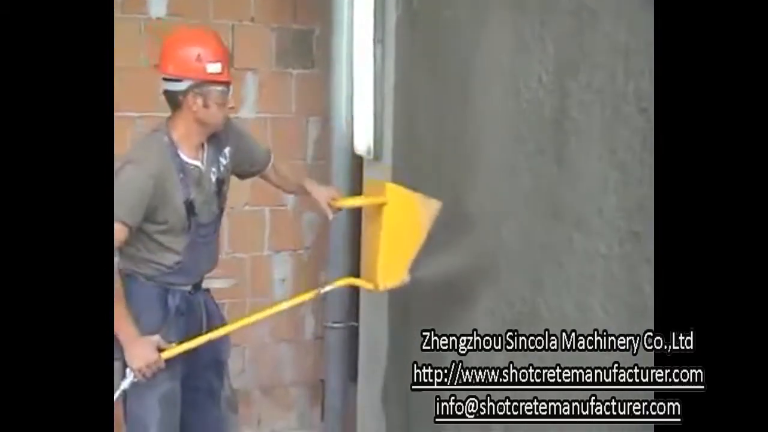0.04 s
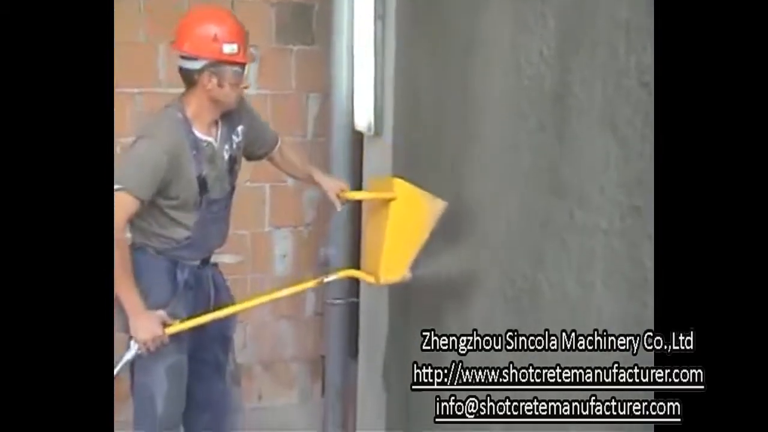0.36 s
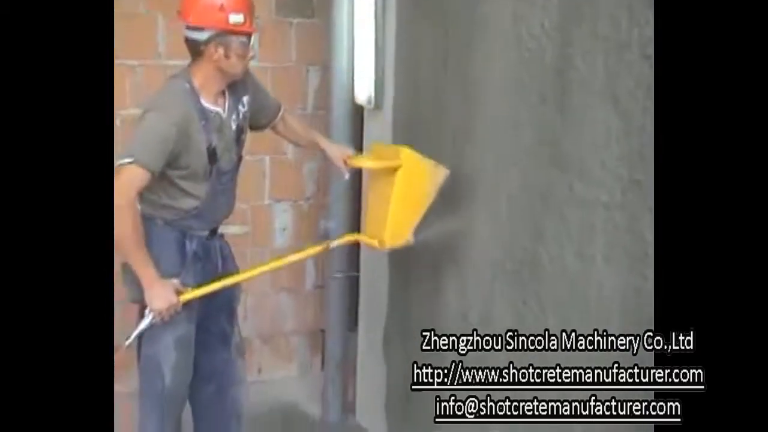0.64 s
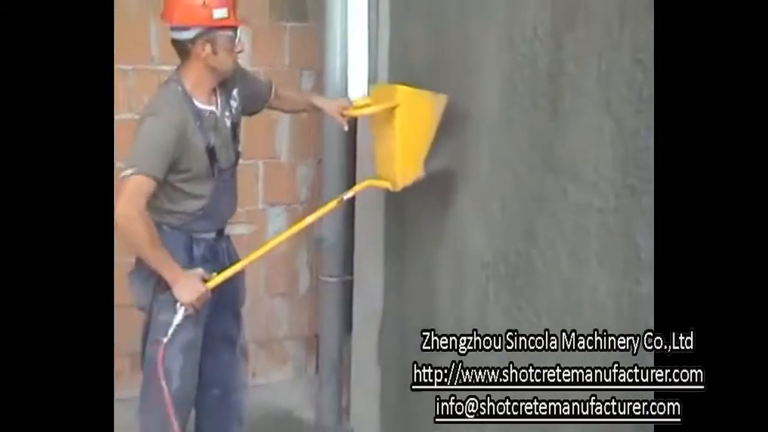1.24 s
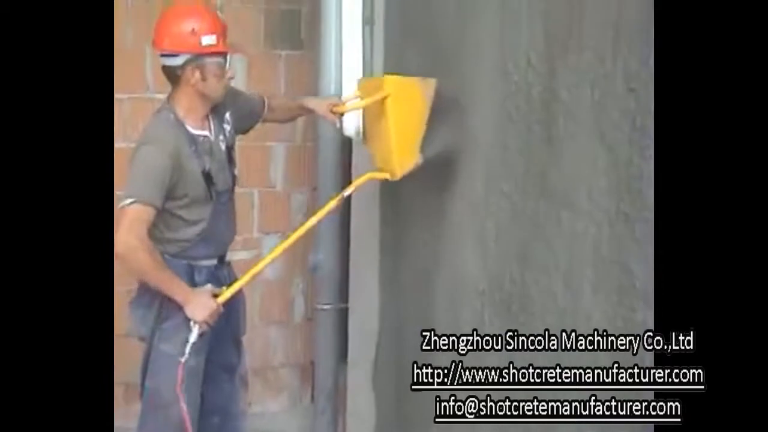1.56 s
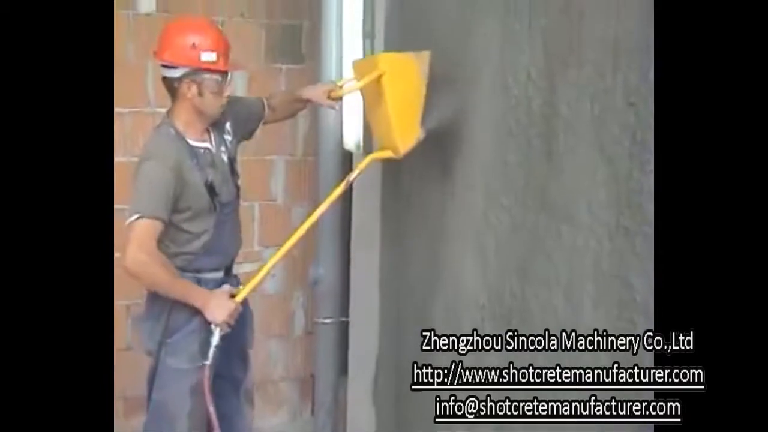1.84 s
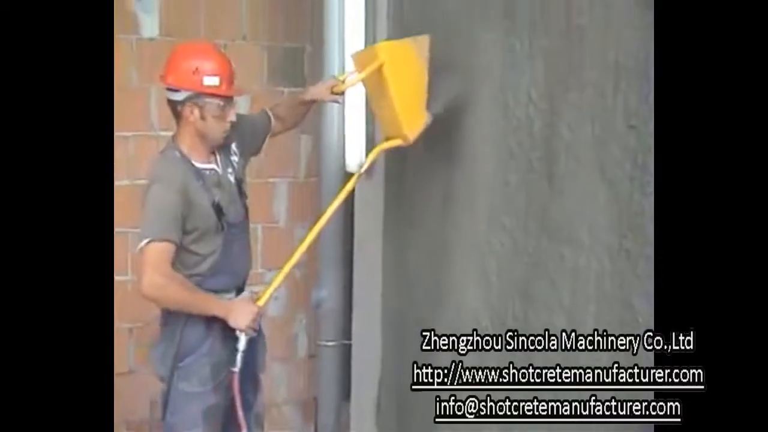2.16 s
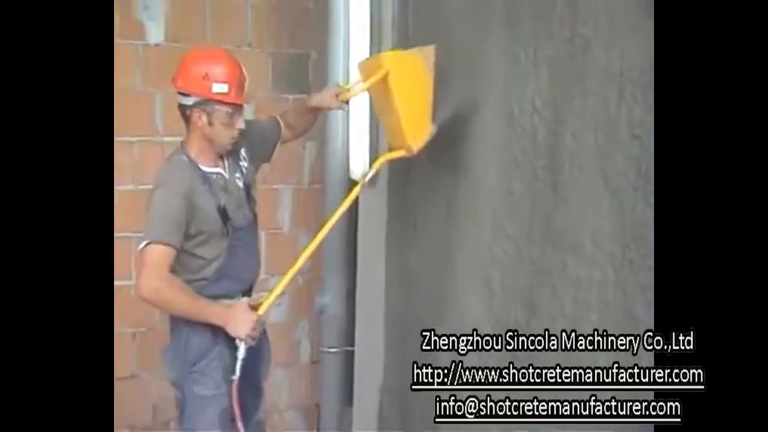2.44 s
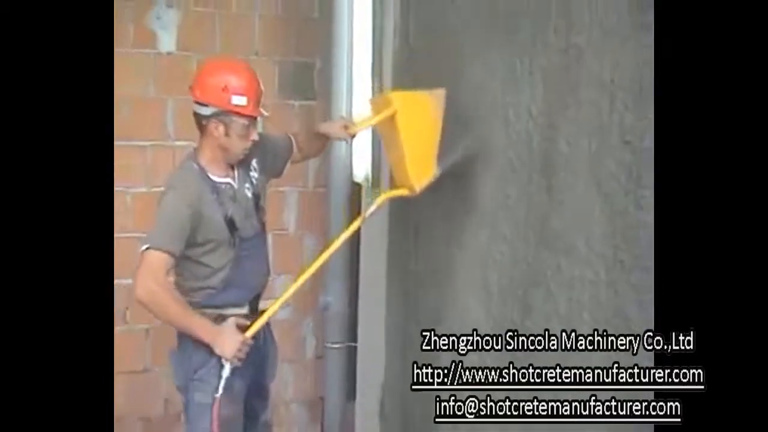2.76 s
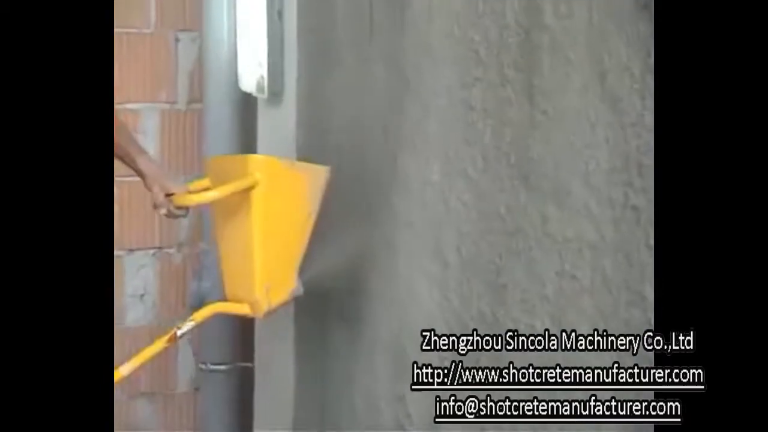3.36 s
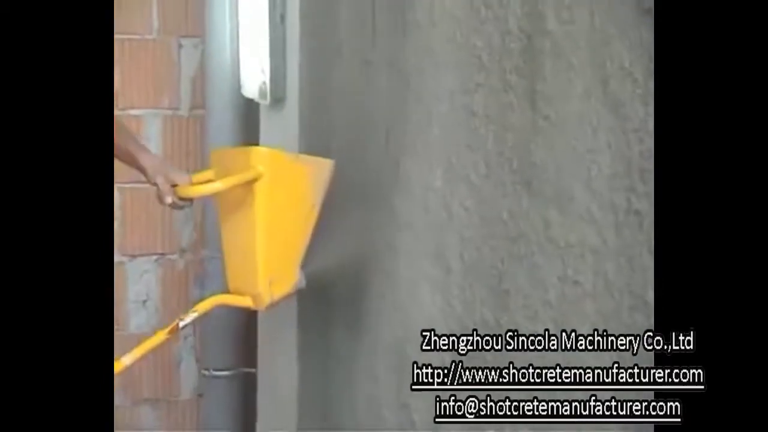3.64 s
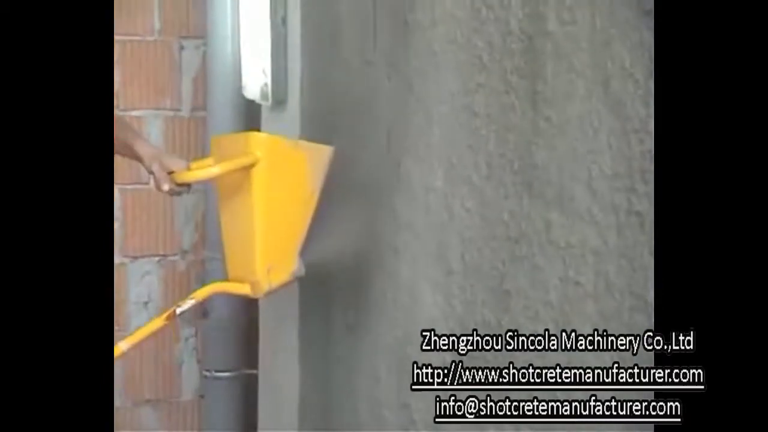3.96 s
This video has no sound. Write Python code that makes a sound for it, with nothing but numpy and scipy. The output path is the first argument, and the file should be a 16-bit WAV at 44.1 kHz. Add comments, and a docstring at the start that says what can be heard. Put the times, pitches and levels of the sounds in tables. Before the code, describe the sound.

A mortar sprayer hisses and sputters, blasting wet grit onto a wall.

```python
"""A bare brick room, one microphone near a hand-held hopper sprayer, a compressor humming in the distance.
Compressed air blows mortar onto the wall: the jet hisses and sputters, wet grit patters, the hopper
burbles and drones, and the wall's echo sweeps the hiss as the tool is raised.
The spray dies down; an edit cut leaves an instant's gap, then a second shot of steady spraying follows."""
import sys
import numpy as np
from scipy import signal
from scipy.fft import rfft, irfft
from scipy.io import wavfile
from scipy.ndimage import uniform_filter1d, map_coordinates

SR = 44100
rng = np.random.default_rng(int(sys.argv[2]) if len(sys.argv) > 2 else 0)


def wav_record(signal):
    """Record a signal, one row per channel, as 16-bit PCM in the file named by sys.argv[1]."""
    frames = np.transpose(np.atleast_2d(signal))
    bounded = np.clip(frames, -1, 1)
    # unit amplitude maps onto the largest positive 16-bit level
    quanta = np.round(bounded * 32767).astype(np.int16)
    wavfile.write(sys.argv[1], SR, quanta)


N = 176400

# Faders of the spray, tool raised and tool held: time_s, hiss_db, treble_db, splatter_db, burble_db
RAISED_LEVELS = [(0, -35, -43, -46.5, -55), (0.22, -41.5, -49, -49.5, -67), (0.38, -37.5, -47, -49.5, -56),
                 (0.56, -31.5, -38.5, -38.5, -48), (0.75, -28.5, -36.5, -36, -45),
                 (0.92, -25.5, -33.5, -34.5, -40.5), (1.1, -26.5, -33, -34, -37),
                 (1.42, -22.5, -31, -28.5, -32), (1.62, -21.5, -29, -34, -32.5),
                 (2.02, -22.5, -29.5, -30.5, -32), (2.18, -23, -29, -30, -35.5),
                 (2.32, -22.5, -28.5, -29, -30), (2.55, -24, -31, -33, -30), (2.74, -23.5, -31, -29, -31.5),
                 (2.86, -30, -41, -34.5, -32.5), (2.96, -41.5, -53, -41.5, -39), (3.06, -46, -67, -44, -43)]
HELD_LEVELS = [(3.1, -29, -34, -37, -37.5), (3.24, -26, -32, -33.5, -42), (3.42, -27, -33.5, -35.5, -38),
               (3.56, -26, -32.5, -35.5, -36.5), (3.78, -25.5, -33, -37.5, -38.5),
               (3.9, -30.5, -37.5, -40, -40), (4.0, -36, -43, -41, -48)]


def undb(db):
    """Decibels to gain."""
    return 10 ** (np.asarray(db) / 20)


def unit(x):
    """Scale to rms 1."""
    return x / np.sqrt(np.mean(x ** 2))


def curve(rows, column=1):
    """One column of a table, joined by straight lines in time."""
    rows = np.array(rows)
    return np.interp(np.arange(N) / SR, rows[:, 0], rows[:, column])


def colour(x, spectrum):
    """Filter by rows of freq_hz, gain_db; rms 1."""
    hz, db = np.array(spectrum).T
    log_hz = np.log(np.arange(N // 2 + 1) * SR / N + 1)
    gain = undb(np.interp(log_hz, np.log(hz), db, left=-80, right=-80))
    return unit(irfft(rfft(x) * gain, N))


def ring(x, hz, width_hz):
    """A resonance with steep skirts; rms 1."""
    bin_hz = np.arange(N // 2 + 1) * SR / N
    return unit(irfft(rfft(x) / (1 + 1j * (bin_hz - hz) / width_hz) ** 2, N))


def walk(rate_hz):
    """Smooth random wander; rms 1."""
    hold = max(int(SR / rate_hz), 1)
    steps = rng.standard_normal(N)[np.arange(N) // hold]
    return unit(uniform_filter1d(uniform_filter1d(steps, hold), hold))


def turbulence(hz, width_hz):
    """A band of noise around a moving centre; rms 1."""
    phase = 2 * np.pi * np.cumsum(hz) / SR
    return unit(walk(width_hz) * np.cos(phase) + walk(width_hz) * np.sin(phase))


def site_background():
    """The faint, even noise of the building site."""
    spectrum = [(120, -16.5), (350, -3), (1000, -3.5), (3000, -3), (7000, -24.5)]  # freq_hz, gain_db
    return undb(-62) * colour(rng.standard_normal(N), spectrum)


def compressor(pitch_hz=57.3, level_db=-77):
    """A compressor far from the microphone: one low hum that swells."""
    # Swell of the hum: time_s, gain_db
    swell = [(0, -14), (.5, -3.5), (1.0, 3), (2.2, -1.5), (2.8, 4), (3.6, 10), (4.0, 7)]
    hum = np.sin(2 * np.pi * pitch_hz * np.arange(N) / SR + .4 * walk(8.4))
    return undb(level_db + curve(swell)) * unit(hum)


def room(x, t60_s=.6, wet_db=-8.5):
    """Add a short diffuse tail from the bare walls."""
    t = np.arange(SR // 2) / SR
    tail = rng.standard_normal(len(t)) * np.exp(-np.log(1000) * t / t60_s) * (t > .006)
    wet = signal.fftconvolve(x, tail / np.linalg.norm(tail))[:N]
    return (x + undb(wet_db) * wet) / np.hypot(1, undb(wet_db))


def reflect(x, echoes):
    """Echoes (lag_ms, strength) reach the microphone just after the direct sound and comb-filter it."""
    late = sum(strength * map_coordinates(x, [np.arange(N) - lag_ms * SR / 1000], order=1, mode="mirror")
               for lag_ms, strength in echoes)
    return (x + late) / np.sqrt(1 + sum(strength ** 2 for _, strength in echoes))


def blast_rumble():
    """The low rumble of the air blast."""
    # Spectrum of the rumble: freq_hz, gain_db
    spectrum = [(25, -24.5), (42, -21), (55, -5.5), (72, -10.5), (95, -7), (128, 1), (160, 1), (220, -23.5)]
    # Its rise and fall: time_s, level_db
    levels = [(0, -90), (.35, -78), (.62, -68.5), (.92, -55.5), (1.1, -59), (1.3, -57), (1.65, -55.5),
              (1.8, -51.5), (2.2, -67), (2.45, -62.5), (2.62, -53.5), (2.85, -60.5), (3.1, -77),
              (3.4, -60.5), (3.7, -63.5), (4.0, -66)]
    return colour(rng.standard_normal(N), spectrum) * undb(curve(levels))


def hopper_drone(waver_hz=11.9, flutter_db=3.5, roughness=.66):
    """The air in the hopper sounds one wavering, fluttering note that shifts as the mortar sinks."""
    # Course of the note: time_s, pitch_hz, level_db
    course = [(1.2, 330, -62), (1.4, 325, -47), (1.56, 318, -40.5), (1.66, 296, -46.5), (1.85, 298, -41),
              (1.92, 262, -44), (2.02, 282, -38), (2.17, 290, -50.5), (2.52, 305, -48),
              (2.69, 304.5, -36.5), (2.87, 294.3, -36.5), (2.94, 295, -48), (3.06, 295, -63)]
    pitch_hz = curve(course)
    phase = 2 * np.pi * np.cumsum(pitch_hz + waver_hz * walk(110)) / SR
    tone = unit(np.sin(phase) * undb(flutter_db * walk(80)))
    note = unit(tone + roughness * turbulence(pitch_hz, width_hz=220))
    return note * undb(curve(course, 2)) * (np.arange(N) / SR > course[0][0])


def squelch():
    """Mortar sags in the throat: a narrow band of hiss swoops down and back up."""
    # The swoop: time_s, centre_hz, level_db
    swoop = [(2.62, 2700, -55), (2.66, 2400, -40), (2.695, 1850, -35), (2.715, 1450, -33),
             (2.735, 1700, -35), (2.755, 2200, -40), (2.80, 2600, -48), (2.86, 2600, -70)]
    t = np.arange(N) / SR
    band = turbulence(curve(swoop), width_hz=520)
    return band * undb(curve(swoop, 2)) * (t > swoop[0][0]) * (t < swoop[-1][0])


def spits(decay_s=.007):
    """Short resonant bursts as clots of mortar clear the nozzle."""
    # One clot a row: start_s, pitch_hz, width_hz, peak_db
    clots = [(3.104, 2600, 1820, -29.5), (3.12, 2360, 500, -23.5), (3.204, 3200, 482, -17),
             (3.256, 538, 140, -26), (3.806, 380, 120, -29)]
    t, out = np.arange(N) / SR, 0
    for start_s, pitch_hz, width_hz, peak_db in clots:
        puff = rng.standard_normal(N) * (t >= start_s) * np.exp(-np.abs(t - start_s) / decay_s)
        burst = ring(puff, pitch_hz, width_hz)
        out = out + undb(peak_db) * burst / np.abs(burst).max()
    return out


def hollow_tones(fade_s=.19):
    """The jet raises tones that come, glide and go as the gap between hopper and wall changes."""
    # Tones of the gap: start_s, end_s, start_hz, end_hz, width_hz, gain_db (on the hiss fader)
    tones = [(0, 0.414, 1345, 1420, 201, -16), (0, 0.659, 1017, 1119, 140, -19),
             (0.037, .3, 4180, 4180, 400, -15.5), (.15, .64, 2867, 3180, 363.3, -11.5),
             (0.388, 0.881, 1620, 1527, 379.5, -14), (0.601, 0.817, 3350, 3550, 400, -14.5),
             (0.599, 1.304, 2067, 1754, 240.1, -15), (.72, 1.099, 4080, 3770, 449, -23),
             (0.759, 1.001, 2510, 2443, 281.3, -11.5), (0.877, 1.326, 1064, 1005, 110, -14),
             (1.02, 1.479, 2656, 2396, 230.3, -13.5), (1.351, 1.8, 2755, 2590, 219.2, -16),
             (1.357, 1.875, 206, 201.2, 36.1, -22.5), (1.8, 2.419, 3100, 2810, 1101, -12),
             (2.108, 2.4, 700, 691, 109.7, -19.5), (2.254, 2.642, 224.7, 212.4, 49.94, -22.5),
             (2.654, 3.056, 1988, 1896, 340.5, -16), (2.808, 3.06, 874, 845, 99.7, -11)]
    t, out = np.arange(N) / SR, 0
    for start_s, end_s, start_hz, end_hz, width_hz, gain_db in tones:
        fade = np.clip(np.minimum(t - start_s, end_s - t) / fade_s + .5, 0, 1)
        glide_hz = np.interp(t, [start_s, end_s], [start_hz, end_hz])
        out = out + fade * undb(gain_db) * turbulence(glide_hz, width_hz)
    return out * undb(curve(RAISED_LEVELS))


def held_rings(swell_db=2.2, swell_hz=25):
    """Resonances that swell and sink while the tool stays in one place."""
    # Resonances at that spot: pitch_hz, width_hz, gain_db (on the hiss fader)
    resonances = [(560, 50, -18.5), (933, 26, -24), (1366, 110, -21), (1644, 70, -17), (1876, 140, -13),
                  (2120, 120, -15.5), (2510, 60, -16), (2606, 84, -16.5), (3044, 110, -13),
                  (3190, 50, -20.5), (3456, 40, -20.5)]
    out = 0
    for pitch_hz, width_hz, gain_db in resonances:
        swell = undb(gain_db + swell_db * walk(swell_hz))
        out = out + swell * ring(rng.standard_normal(N), pitch_hz, width_hz)
    return out * undb(curve(HELD_LEVELS))


def gritty_air(grit, grains_per_s=3000, spread_db=3.5):
    """Turbulent air mixed with the ticks of sand grains; grit is their share of the power."""
    hits = rng.random(N) < grains_per_s / SR
    polarity = np.sign(rng.standard_normal(N))
    sizes = undb(spread_db * np.minimum(rng.exponential(size=N), 6))
    grains = unit(hits * polarity * sizes)
    return np.sqrt(1 - grit) * rng.standard_normal(N) + np.sqrt(grit) * grains


def sprayer(levels, echoes, roar=0, sputter_hz=100.5, surge_hz=39.72):
    """The jet sputters as mortar feeds in; mortar splatters on the wall and air burbles in the hopper."""
    # Spectra of the jet's hiss, its treble, the splatter and the burble: freq_hz, gain_db
    hiss_spectrum = [(700, -41.5), (1050, -4), (1400, -1.5), (1900, 2.5), (2600, 2), (3300, 2),
                     (3900, -4.5), (4700, -24), (6000, -51)]
    treble_spectrum = [(2800, -34.5), (3600, -3.5), (4150, -1.5), (4700, -4.5), (5300, -8.5), (6000, -14.5),
                       (6500, -18.5), (7000, -36)]
    splatter_spectrum = [(220, -35), (380, 0.5), (500, 5), (620, 2), (800, 5.5), (1100, 3), (1400, 2.5),
                         (2200, -12.5)]
    burble_spectrum = [(110, -29), (160, -31), (205, 1), (240, -4.5), (298, -2.5), (340, 3.5), (430, -12),
                       (700, -28.5)]
    feed = undb(.85 * walk(sputter_hz) + .2 * walk(surge_hz))
    hiss = (colour(gritty_air(grit=.28), hiss_spectrum) * undb(-5.5) + roar) * undb(curve(levels, 1))
    treble = colour(gritty_air(grit=.28), treble_spectrum) * undb(curve(levels, 2) - 4)
    splatter = colour(gritty_air(grit=.68), splatter_spectrum) * undb(curve(levels, 3) - 6)
    burble = colour(gritty_air(grit=.45), burble_spectrum)
    burble *= undb(curve(levels, 4) - 10.5 + .63 * walk(30))
    return feed * (reflect(room(hiss + treble + splatter), echoes) + burble)


def raised_pass():
    """The tool is raised: moving echoes sweep the hiss; the roar climbs, then drops as the flow ends."""
    # Echoes off the wall behind the nozzle and off the hopper's side: time_s, lag_ms, strength
    wall_echo = [(0, 2.15, .1), (.35, 1.95, .15), (.6, 1.9, .22), (1.0, 2.16, .2), (1.3, 2.42, .16),
                 (1.6, 2.68, .28), (1.8, 2.73, .18), (2.1, 3.02, .14), (2.35, 3.2, .1), (2.65, 3.12, .12),
                 (3.05, 2.3, .05)]
    hopper_echo = [(0, .73, 0.095), (.45, 0.64, 0.089), (.8, 0.5, 0.17), (1.2, .5, 0.034),
                   (3.0, 0.4, 0.049)]
    # The jet's roar: time_s, centre_hz
    roar_centre = [(0, 1500), (.6, 1760), (1.0, 2100), (1.5, 2542), (2.0, 2800), (2.35, 2750), (2.6, 2418),
                   (2.8, 1977), (3.05, 1910)]
    side_wall = (5.2, .11)  # lag_ms, strength
    moving = [(curve(echo, 1), curve(echo, 2)) for echo in (wall_echo, hopper_echo)]
    roar = undb(-12) * turbulence(curve(roar_centre), width_hz=1300)
    spray = sprayer(RAISED_LEVELS, moving + [side_wall], roar)
    return spray + hollow_tones() + hopper_drone() + squelch()


def held_pass():
    """The tool sprays from one position, so its echoes and resonances stay put."""
    # Reflections at that spot: lag_ms, strength
    echoes = [(1.98, 0.094), (2.3, 0.089), (.66, 0.073), (3.5, 0.06)]
    return sprayer(HELD_LEVELS, echoes) + held_rings()


def scene():
    """The raised pass, an edit cut, then the held pass, over a faint hum; mono on both channels."""
    cut_out_s, fade_out_s, cut_in_s, fade_in_s = 3.064, .0027, 3.096, .012
    t = np.arange(N) / SR
    before_cut = np.clip((cut_out_s - t) / fade_out_s + .5, 0, 1)
    after_cut = np.clip((t - cut_in_s) / fade_in_s, 0, 1)
    hum = compressor()
    rumble = (before_cut + after_cut) * blast_rumble()
    spray = before_cut * raised_pass() + after_cut * held_pass()
    mono = site_background() + hum + rumble + spits() + spray
    return np.array([mono, mono])


def record(dry, top_hz=6950):
    """The microphone feeds a narrow-band recorder that cuts the top steeply."""
    return signal.sosfilt(signal.ellip(12, .2, 80, top_hz, fs=SR, output="sos"), dry)


dry = scene()
out = record(dry)
wav_record(out)
```